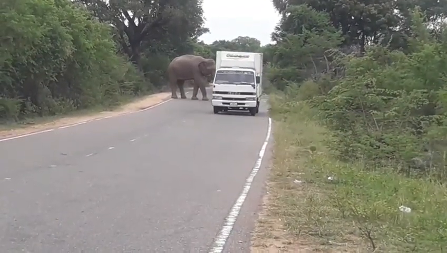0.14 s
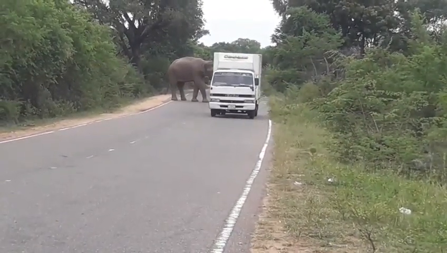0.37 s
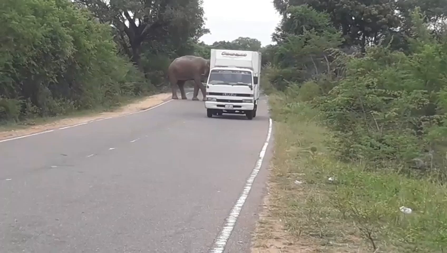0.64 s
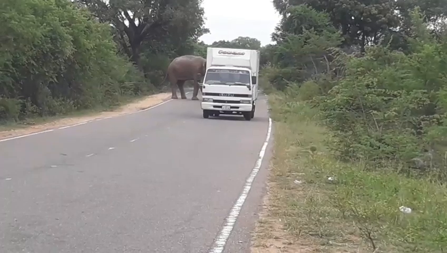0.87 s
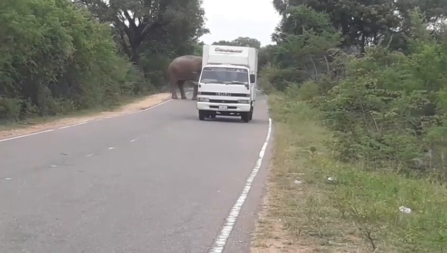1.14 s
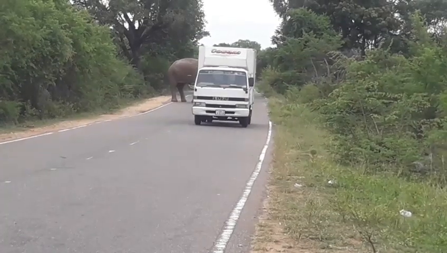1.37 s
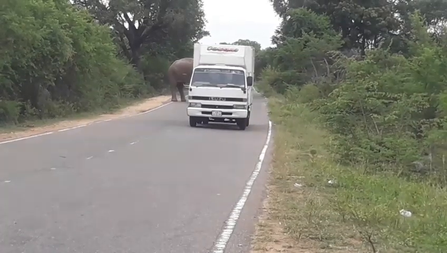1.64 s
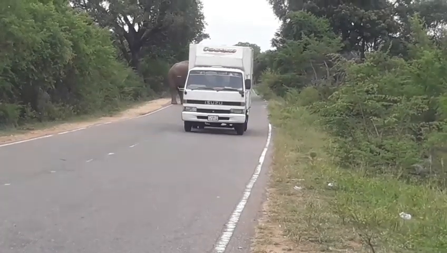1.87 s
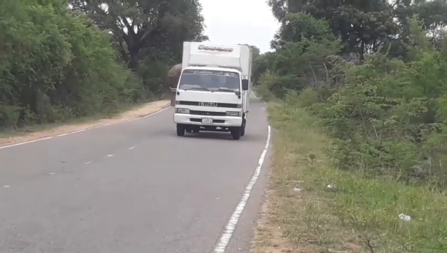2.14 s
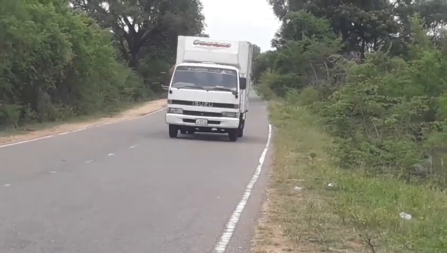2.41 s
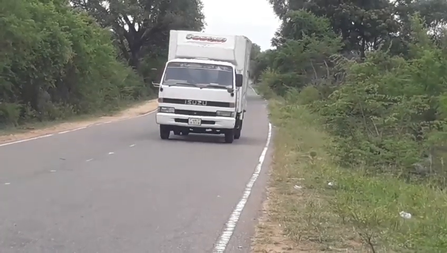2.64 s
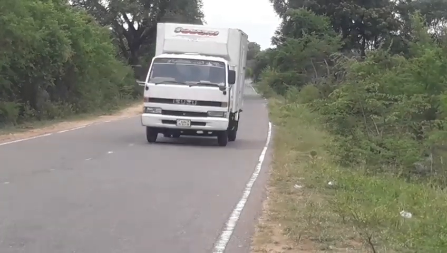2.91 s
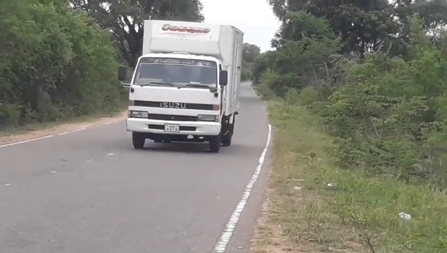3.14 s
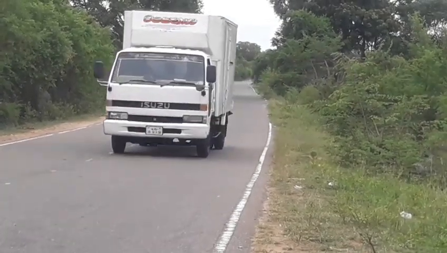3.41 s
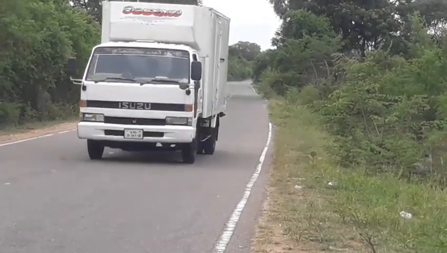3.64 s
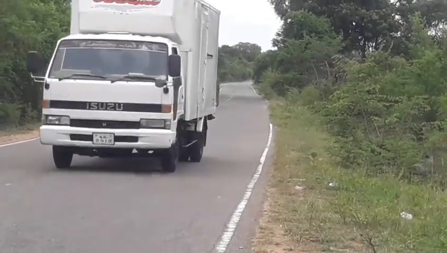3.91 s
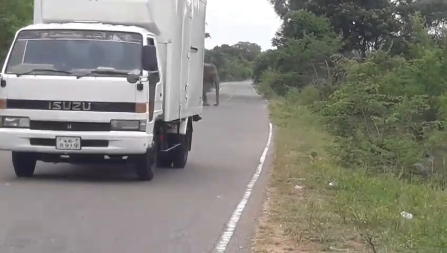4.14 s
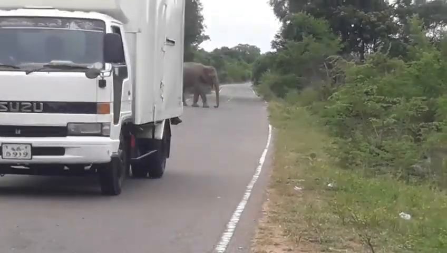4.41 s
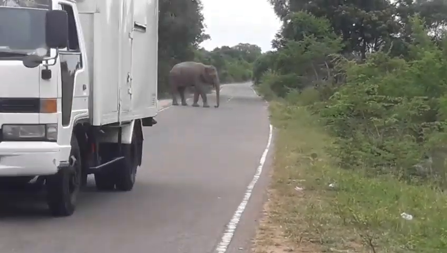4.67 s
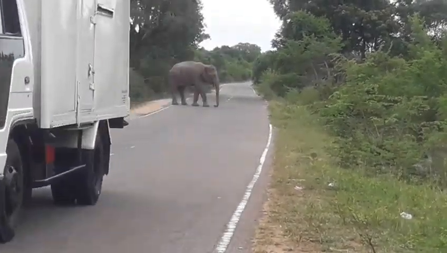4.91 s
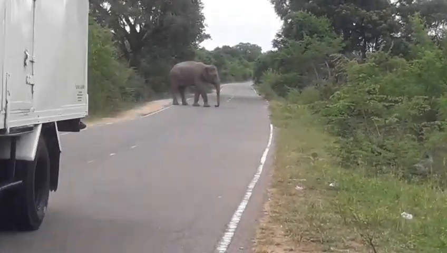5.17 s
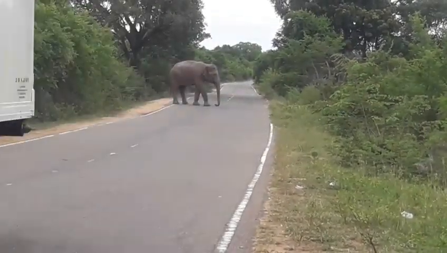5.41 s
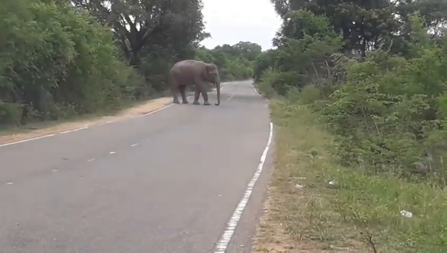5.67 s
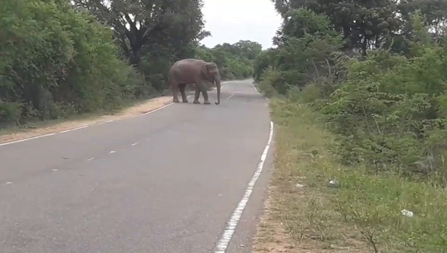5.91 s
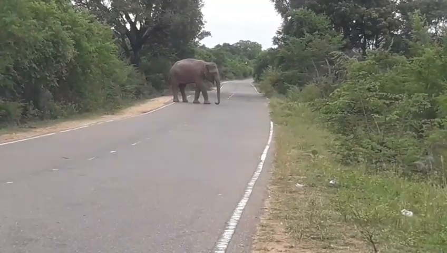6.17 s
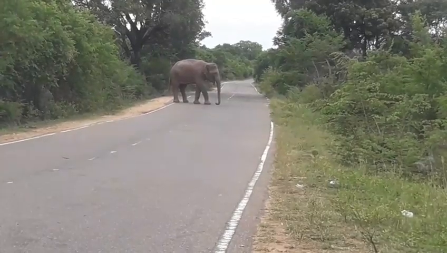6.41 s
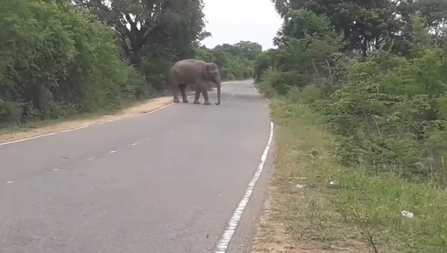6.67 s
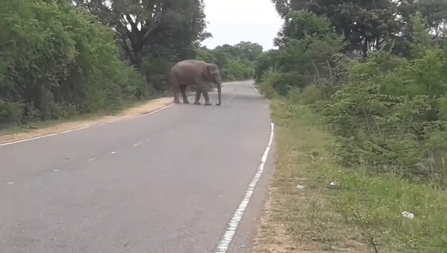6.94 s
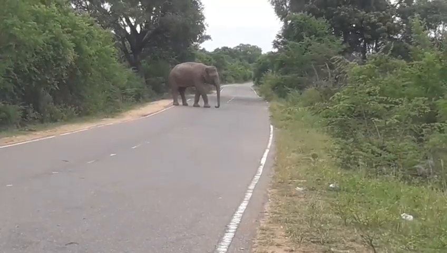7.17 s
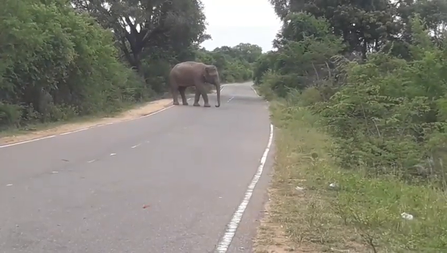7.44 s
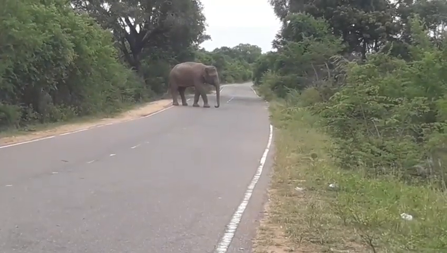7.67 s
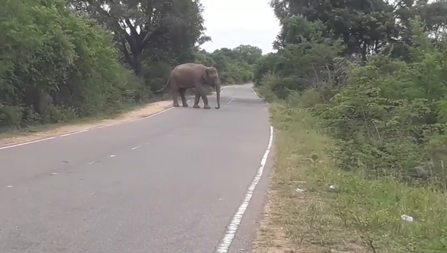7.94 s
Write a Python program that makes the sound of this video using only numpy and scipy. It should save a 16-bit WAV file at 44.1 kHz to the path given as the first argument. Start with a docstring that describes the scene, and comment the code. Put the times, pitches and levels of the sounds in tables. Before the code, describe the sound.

Soft low wind bumps open over faint leafy hiss while a diesel truck rattles in the distance. Its engine clatter, knocking and fan hum swell for six seconds into a loud, bright, close pass. Wind buffets the microphone, then the truck recedes within a second to a duller growl and a beating low tone. A tiny click and dull thud come just before the end. Open air, static microphone.

```python
"""Diesel truck passing on a country road

A four-cylinder truck creeps up, passes close to the microphone and pulls away. Noise pulsed at the firing
rate and filtered by the side in view makes the block's clatter; sines locked to the firings make exhaust and fan.
A valve ticks, a part knocks once a cycle, intake hiss and damped pings shine, and two tones beat from behind.
Damped low swings of wind thump the microphone over a rumble and the smooth filtered hiss of the scrub.
Near the end a dull thud and a faint click fall together as the bright hiss drops."""
import sys
import numpy as np
from scipy import signal
from scipy.fft import rfft, irfft
from scipy.io import wavfile
from scipy.ndimage import uniform_filter1d

SR = 44100
rng = np.random.default_rng(int(sys.argv[2]) if len(sys.argv) > 2 else 0)


def wav_out(sig):
    """Save sig, one row per channel (or a flat mono array), as 16-bit PCM at SR to the path in sys.argv[1]."""
    wavfile.write(sys.argv[1], SR, np.round(np.clip(np.atleast_2d(sig).T, -1, 1) * 32767).astype(np.int16))


def ratio(d):
    """dB to gain"""
    e = np.asarray(d, float) / 20
    return 10 ** e


N = 355446
T = np.arange(N) / SR
# bins and frame times of the short-time spectra that shape noise
HZ, FRAME_S = np.fft.rfftfreq(2048, 1 / SR), np.arange(-(-N // 512) + 1) * 512 / SR
STEADY = np.zeros((1, len(FRAME_S)))

# Engine speed: t/s, firing rate/(1/s)
FIRING_RATE = [(0, 44.1), (3.3, 48.18), (4.2, 48.61), (5.3, 47.48), (6.5, 44.79), (7.5, 45.06),
               (8.06, 45.95)]
TICK_S = 6.04  # a moment when the loud valve shuts
# Loudness as the truck nears, passes and pulls away: t/s, clatter level from 500 to 3000 Hz/dB
PASS_LEVEL = [(0, -39), (1.0, -37.5), (2.0, -34), (3.6, -27.5), (4.1, -24.5), (5.3, -18), (6.0, -10),
              (6.15, -10.5), (6.375, -14), (6.6, -22.5), (6.9, -28.5), (7.3, -31.5), (7.55, -31),
              (7.76, -28), (8.06, -31.5)]
# Side in view, 0 far front, 1 near front, 2 flank, 3 tail: t/s, facing/1
FACING = [(0, 0.056), (1.5, 0.021), (3, 0.23), (4.5, 0.84), (5.2, 1.27), (5.7, 1.64), (6.1, 1.96),
          (6.5, 2.14), (6.9, 2.53), (7.3, 2.84), (8.06, 2.56)]
# Clatter spectrum radiated by each side: f/Hz, relative level per Hz/dB
FAR_FRONT = [(29, -56), (50, -27), (111, -17.5), (188, -4.5), (418, -14.5), (501, -15), (676, -11),
             (1010, -13), (2390, -14), (3100, -34.5), (6000, -30), (7800, -39), (13200, -120)]
NEAR_FRONT = [(29, -56), (50, -24), (117, -25.5), (184, -9.5), (439, -16.5), (595, -14.5), (678, -11),
              (843, -10), (1450, -10), (1970, -10), (3460, -32.5), (6790, -30), (9000, -50.5), (11700, -75),
              (19800, -120)]
FLANK = [(29, -43), (50, -15), (107, -11), (151, -3.5), (201, -7.5), (250, -8), (377, -2.5), (649, -7),
         (939, -6), (1020, -8.5), (2010, -1.5), (2610, -7.5), (3540, -23.5), (6360, -20.5), (9000, -58),
         (11700, -70), (19800, -120)]
TAIL = [(29, -65), (50, -37), (90, -37), (180, -5), (250, -16), (377, -5.5), (523, -21.5), (608, -5.5),
        (760, -17), (1390, -27.5), (2100, -21), (2450, -27), (6360, -41.5), (9000, -83)]
# Cab and bonnet panels heard from the front: f/Hz before the slide, width/Hz, lift or dip/dB
PANELS = [(432, 44, -7), (550, 135, 5.5), (670, 40, -13.5), (864, 46, 7.5), (927, 49, -7), (1456, 135, 3.5),
          (1740, 260, -2), (1870, 60, 3), (2130, 260, -2.5), (1040, 24, -2.5), (2240, 270, -0.5),
          (2060, 90, 1)]
PANEL_RISE = 0.085  # share by which the pattern slides up as the road echo lengthens near the microphone
# Low growl that swells as the truck pulls away: f/Hz, width/Hz, lift/dB
GROWL = [(680, 330, 7), (2050, 250, 2.8)]
GROWL_START_FULL_S = (7.39, 7.93)  # start t/s, full t/s
# Shares of the clatter alike in every cycle and in every firing, beside unit random noise
REPEAT_CYCLE, REPEAT_FIRING = 0.55, 0.35

# Five exhaust orders, then the belt-driven fan: multiple of firing rate/1, then level re clatter/dB
# from afar, from the near front, abreast of the cab and from behind, each before masking and waver
HUM = [(1, -27.5, -25, -19.5, -26.5), (2, -19.5, -22, -20, -13), (3, -13.5, -20.5, -17.5, -13.5),
       (3.498, -21, -8, -15.5, -14), (4, -6, -4.5, -19.5, -6.5), (4.85, -29, -10.5, -12, -14.5)]
# Facing at which the hum has those four levels: facing/1
HUM_FACING = (.1, 1.3, 1.7, 2.7)
# Masking of the hum by the box body as it slides by: facing/1, width in facing/1, dip/dB
BOX_MASK = [(2.05, 0.27, -18)]
# Weak lines filled in by uneven cylinders: multiple of the four-firing cycle/1,
# level re clatter before shading and waver/dB
CYCLE_ORDERS = [(17, -20.5), (18, -14.5), (22, -29), (24, -15.5), (28, -20), (32, -21), (68, -22),
                (72, -17.5), (92, -34), (96, -23.5)]

KNOCK_HZ, KNOCK_T60_S = 1002, 0.074
KNOCK_LAG = 2.15  # firings after the tick
KNOCK_DB = 9  # blow re clatter, before its soft onset and shading

# Spectrum of intake and injector hiss: f/Hz, relative level per Hz/dB
AIR = [(8500, -15), (9200, -10), (10500, -1.5), (12600, -7), (13400, -1.5), (15300, 2), (16000, -19)]
# Intake directivity, heard best just ahead of the flank: facing/1, hiss level re clatter/dB
INTAKE = [(.05, -36.5), (.3, -29), (.85, -33.5), (1.3, -27.5), (1.65, -24), (1.87, -35), (2.05, -39),
          (2.3, -31.5), (2.85, -34.5)]
AIR_DROP_S, AIR_DROP_DB = 7.85, -14  # the bright hiss drops suddenly
# Bright pings of the passing truck, and at 7.848 s a faint separate click: t/s, level/dB, f/Hz
PINGS_AND_CLICK = [(4.561, -34, 11300), (5.7942, -17, 14400), (6.0477, -32, 14400), (6.563, -27, 13800),
                   (7.27, -45, 12500), (7.848, -43, 11500)]

# Drone behind the truck: t/s, f of the lower tone/Hz, its level/dB
DRONE = [(6.1, 376, -28), (6.28, 375, -60), (6.42, 377.4, -20), (6.5, 380, -24), (6.62, 366.5, -52),
         (6.85, 373, -27.5), (7.2, 371.8, -26), (7.84, 375, -31), (7.95, 374, -59)]
# Upper tone of the drone: t/s, level re the lower tone/dB
DRONE_UPPER = [(7.0, -14), (7.3, -1.5), (7.8, -0.5)]
BEAT_HZ, IN_PHASE_S = 7.7, 7.46  # difference of the two tones, and a moment when they add

# Low thumps: wind gusts on the microphone, and at 7.835 s a dull thud that is not wind but goes
# with the faint click: t/s, nominal level/dB, f/Hz
GUSTS_AND_THUD = [(0.136, -24.5, 121), (0.266, -20.5, 106), (0.298, -20.5, 151), (0.439, -26, 80.7),
                  (0.667, -31, 70.0), (0.71, -35, 96), (2.302, -27, 145), (5.75, -15, 86.1),
                  (5.93, -7, 140), (7.835, -38, 45)]
# Spectrum of the wind rumble: f/Hz, relative level per Hz/dB
RUMBLE = [(20, -29), (45, -2), (90, 4.0), (200, -35), (400, -60)]
# Spectrum of the scrub: f/Hz, relative level per Hz/dB
SCRUB = [(1470, -35), (2500, -5), (2690, -13.5), (3630, -14), (4470, -46), (4830, -10), (5940, -11.5),
         (7030, 1.5), (7560, -7), (9500, -38.5), (12400, -74), (20900, -120)]
SCRUB_BASE_DB = -52.5
# Scrub hiss, which sinks for a while after the pass: t/s, level above the base/dB
SCRUB_RISE = [(6.3, 7), (6.9, 3.5), (7.84, 5), (7.86, 6.5)]
# Ripple of the microphone housing: f/Hz, width/Hz, lift or dip/dB
HOUSING = [(4320, 330, 3.5), (4920, 260, 3.5), (5570, 430, -4)]


def evened(x):
    """Normalisation: scales a signal to unit rms."""
    return x / np.sqrt(np.mean(x ** 2) + 1e-20)


def read(points, hz):
    """Spectrum: interpolates level linearly over log frequency."""
    f, value = np.transpose(points)
    return np.interp(np.log(hz + 1), np.log(f + 1), value)


def columns(rows, t):
    """Control curves: interpolates every later column at values t of the first."""
    s, *values = np.transpose(rows)
    return [np.interp(t, s, v) for v in values]


def ripple(table, x):
    """Resonance: sums humps and dips in dB, each half as high half a width from its centre."""
    return sum(db / (1 + (2 * (x - centre) / width) ** 2) for centre, width, db in table)


def noise(field_db, patchy_db, drive=None):
    """Time-varying filtering: a flat drive, white noise if none, takes a level field with random patches."""
    drive = rng.standard_normal(N) if drive is None else drive
    spectrum = signal.stft(drive, nperseg=2048, noverlap=1536)[2]
    patches = rng.standard_normal(spectrum.shape[::-1]).T
    patches = uniform_filter1d(patches, size=20, axis=0)
    patches = evened(uniform_filter1d(patches, size=6, axis=1))
    gain = ratio(field_db + patchy_db * patches)
    gain /= np.sqrt(np.mean(gain ** 2))
    return signal.istft(spectrum * gain, nperseg=2048, noverlap=1536)[1][:N]


def firings():
    """Engine phase: the firing rate integrates to a running count, zero at the tick; four make a cycle."""
    count = np.cumsum(columns(FIRING_RATE, T)[0]) / SR
    return count - count[round(TICK_S * SR)]


def gate(count, lag, fire, fall, cylinders_db):
    """Combustion pulses: each firing swells and decays; the four cylinders differ and each blow varies.

    lag and fall (decay constant) are in firings; fire is the swell over a steady floor of 1."""
    late = count - lag
    which = np.floor(late).astype(int)
    blow_db = 1.5 * rng.standard_normal(1000)[which % 1000]
    strength = ratio(np.take(cylinders_db, which % 4) + blow_db)
    pulses = 1 + fire * strength * np.exp(-(late % 1) / fall)
    return evened(uniform_filter1d(pulses, size=100))


def rattle(count):
    """Cyclic excitation: flat noise, partly alike each time round, is pulsed; the valve ticks in the treble."""
    pattern = rng.standard_normal((2, 4096))
    place = np.floor(count * 1024).astype(int)  # crank angle
    repeating = REPEAT_CYCLE * pattern[0, place % 4096] + REPEAT_FIRING * pattern[1, place % 1024]
    repeating = signal.sosfilt(signal.butter(4, 260, "highpass", fs=SR, output="sos"), repeating)
    x = evened(rng.standard_normal(N) + repeating)
    body = x * gate(count, lag=0.13, fire=0.67, fall=0.47, cylinders_db=[-0.46, -0.38, 1.4, 0.32])
    # one valve is much louder than the other three
    metal = x * gate(count, lag=-0.044, fire=1.0, fall=0.68, cylinders_db=[9.0, 2.5, 2.5, 2.5])
    high = signal.butter(2, 3300, "highpass", fs=SR, output="sos")
    behind = np.clip(columns(FACING, T)[0] - 2, 0, 1)  # the box body hides the tick
    return body + (1 - behind) * signal.sosfiltfilt(high, metal - body)


def clatter(count):
    """Source and filter: the block's rattle rings through cab and body, its colour turning with the truck."""
    facing = np.clip(columns(FACING, FRAME_S)[0], 0, 3)
    share = np.maximum(1 - abs(facing - np.arange(4)[:, None]), 0)  # blend of neighbouring sides
    sides_db = np.transpose([read(side, HZ) for side in (FAR_FRONT, NEAR_FRONT, FLANK, TAIL)])
    colour_db = sides_db @ share
    slid_hz = HZ[:, None] / (1 + PANEL_RISE * facing ** 2 / 2)
    colour_db += ripple(PANELS, slid_hz) * np.clip(2 * (2 - facing), 0, 1)
    colour_db += ripple(GROWL, HZ)[:, None] * np.interp(FRAME_S, GROWL_START_FULL_S, [0, 1])
    # colour leaves the power of the middle band unchanged
    middle = (HZ > 500) & (HZ < 3000)
    colour_db -= 10 * np.log10(np.sum(ratio(2 * colour_db[middle]), axis=0))
    x = noise(colour_db, 0.52, rattle(count))
    band = signal.butter(4, [500, 3000], "bandpass", fs=SR, output="sos")
    x /= np.std(signal.sosfilt(band, x))
    return ratio(columns(PASS_LEVEL, T)[0]) * x


def exhaust_and_fan(count):
    """Harmonic orders: near-sines locked to the firing count, each wavering a little in level."""
    facing, clatter_db = columns(FACING, T)[0], columns(PASS_LEVEL, T)[0]
    masked_db = clatter_db + ripple(BOX_MASK, facing)
    levels = [(k, masked_db + np.interp(facing, HUM_FACING, sides_db)) for k, *sides_db in HUM]
    shaded_db = -12 * np.maximum(facing - 1.2, 0)  # the weak lines come from the front
    levels += [(k / 4, clatter_db + shaded_db + db) for k, db in CYCLE_ORDERS]
    out = np.zeros(N)
    for k, db in levels:
        waver = np.interp(T, np.linspace(0, T[-1], num=140), rng.standard_normal(140))
        tone = np.sin(2 * np.pi * (k * count + rng.random()))
        out += np.sqrt(2) * ratio(db + 1.6 * waver) * tone
    return out


def knock(count):
    """Impulse response: once a cycle a part at the front of the engine is struck and rings briefly."""
    blows = np.diff(np.floor((count - KNOCK_LAG) / 4), prepend=0).clip(0, 1)
    t = np.arange(0, KNOCK_T60_S, 1 / SR)
    onset = np.minimum(t / 0.013, 1)
    ring = ratio(-60 * t / KNOCK_T60_S) * onset * np.sin(2 * np.pi * KNOCK_HZ * t)
    shaded_db = -9 * columns(FACING, T)[0]  # hidden by the cab as the truck turns side-on
    sizes = ratio(KNOCK_DB + columns(PASS_LEVEL, T)[0] + shaded_db + 1.5 * rng.standard_normal(N))
    return signal.oaconvolve(blows * sizes, ring)[:N]


def air(count):
    """Turbulence: thin pulsed hiss of intake and injectors, carried only at close range."""
    facing = columns(FACING, T)[0]
    far = np.maximum(1.3 - columns(FACING, FRAME_S)[0], 0)  # from afar only the top of the hiss stands out
    x = evened(noise(read(AIR, HZ)[:, None] - 3.7 * np.outer(HZ < 13000, far), 1.4))
    pulses = gate(count, lag=-0.05, fire=0.73, fall=0.43, cylinders_db=[7.5, -1.5, -2.0, -4.0])
    hiss_db = columns(PASS_LEVEL, T)[0] + columns(INTAKE, facing)[0]
    hiss_db += AIR_DROP_DB * (T > AIR_DROP_S)
    behind = np.clip(2 * (facing - 2), 0, 1)  # from behind the hiss is smooth
    return ratio(hiss_db) * x * (behind + (1 - behind) * pulses)


def pings_and_click():
    """Damped oscillation: very short high sines make the truck's pings and, last, a faint separate click."""
    out = np.zeros(N)
    t = np.arange(200) / SR
    envelope = np.exp(-t / 0.00092) * np.minimum(t / 0.0002, 1)
    for s, db, hz in PINGS_AND_CLICK:
        out[round(s * SR):][:len(t)] += ratio(db) * envelope * np.sin(2 * np.pi * hz * t)
    return out


def drone():
    """Beats: two close tones from behind alternately add and cancel about eight times a second."""
    hz, db = columns(DRONE, T)
    start, end = DRONE[0][0], DRONE[-1][0]
    on = np.interp(T, [start - 0.1, start, end, end + 0.05], [0, 1, 1, 0])
    phase = 2 * np.pi * np.cumsum(hz) / SR
    beat_phase = 2 * np.pi * BEAT_HZ * (T - IN_PHASE_S)
    upper = ratio(columns(DRONE_UPPER, T)[0]) * np.sin(phase + beat_phase)
    return ratio(db) * on * (np.sin(phase) + upper)


def gusts_and_thud():
    """Damped swing: a couple of low cycles make each wind gust on the microphone and, last, a dull thud."""
    out = np.zeros(N)
    for s, db, hz in GUSTS_AND_THUD:
        u = np.arange(0, 5, hz / SR)  # time in cycles
        swell = np.e * u / 0.61 * np.exp(-u / 0.49)
        out[round(s * SR):][:len(u)] += ratio(db) * swell * np.sin(2 * np.pi * u)
    return out


def wind_rumble():
    """Pressure fluctuation: low noise whose level wanders at random makes a lumpy rumble."""
    lumps_db = 5 * np.interp(FRAME_S, np.linspace(0, T[-1], num=150), rng.standard_normal(150))
    rumble = noise(read(RUMBLE, HZ)[:, None] + lumps_db, 0.81)
    return ratio(np.interp(T, [0.8, 1.2], [-50, -56])) * evened(rumble)


def scrub():
    """Incoherent sum: the many small sounds of leaves and insects merge into smooth distant hiss."""
    level_db = SCRUB_BASE_DB + columns(SCRUB_RISE, T)[0]
    return ratio(level_db) * evened(noise(read(SCRUB, HZ)[:, None] + STEADY, 0.88))


def scene():
    """Superposition: the truck's sources, the short events, the scrub and the wind add at one point."""
    count = firings()
    truck = exhaust_and_fan(count) + clatter(count) + knock(count) + air(count) + drone()
    events = pings_and_click() + gusts_and_thud()
    return (truck + events + scrub() + wind_rumble())[None]


def band_limit(x):
    """A steep low-pass at the top of the band."""
    return signal.sosfilt(signal.butter(12, 15520, fs=SR, output="sos"), x)


def record(dry):
    """Transduction: the housing colours the treble, the lowest bass is cut, peaks round off near full scale."""
    housing_gain = ratio(ripple(HOUSING, np.fft.rfftfreq(N, 1 / SR)))
    coloured = irfft(rfft(dry) * housing_gain, N)
    coloured = signal.sosfilt(signal.butter(3, 36, "highpass", fs=SR, output="sos"), coloured)
    rounded = 1.15 * np.tanh(coloured / 1.15)
    return band_limit(rounded)


dry = scene()
out = record(dry)
wav_out(out)
```